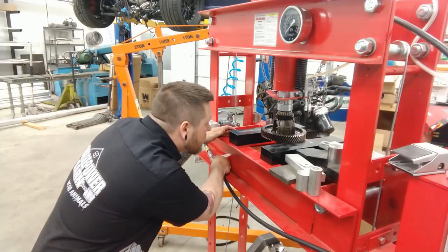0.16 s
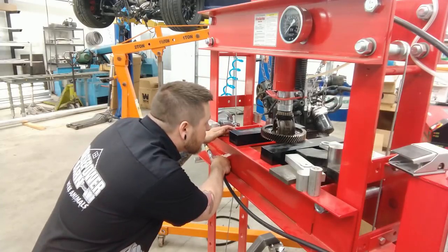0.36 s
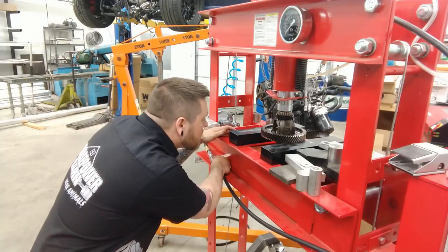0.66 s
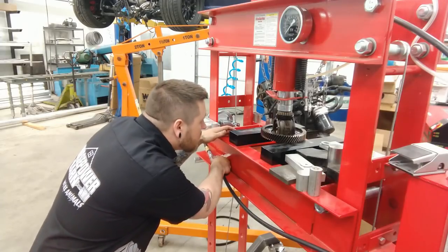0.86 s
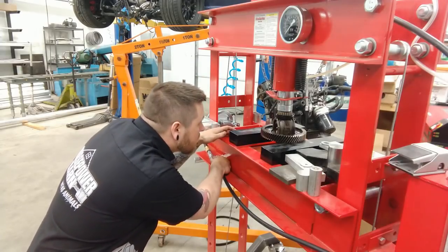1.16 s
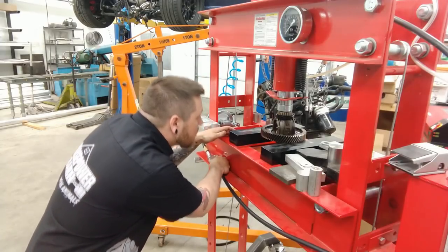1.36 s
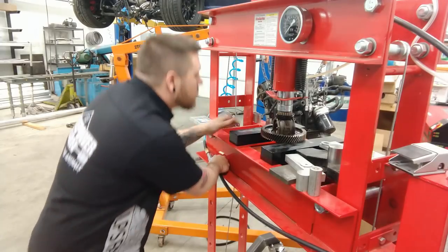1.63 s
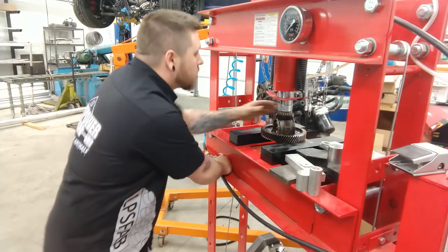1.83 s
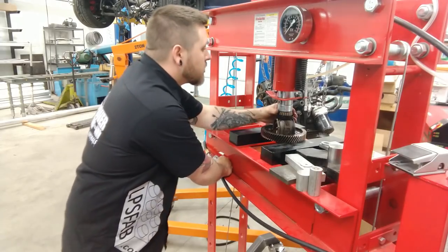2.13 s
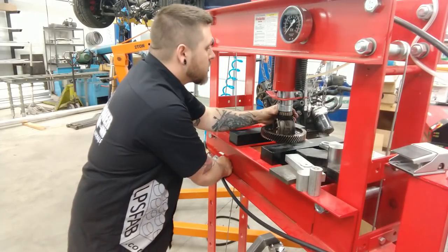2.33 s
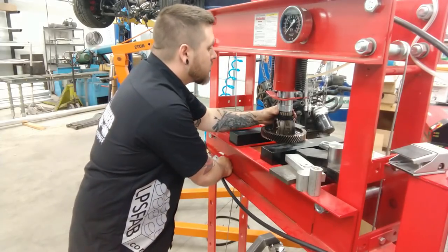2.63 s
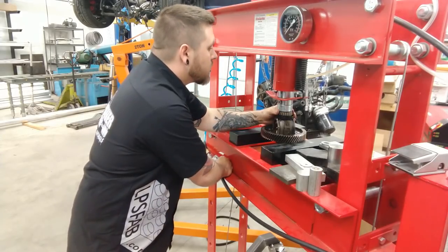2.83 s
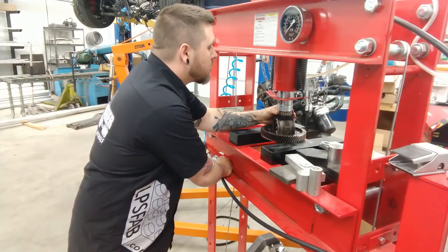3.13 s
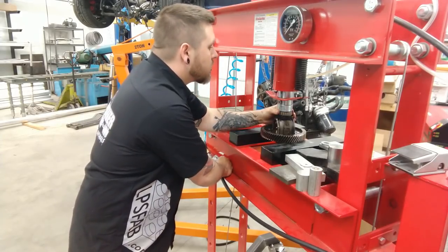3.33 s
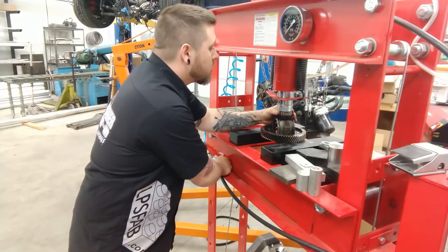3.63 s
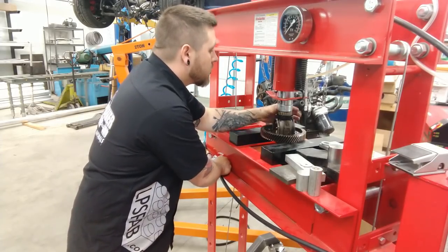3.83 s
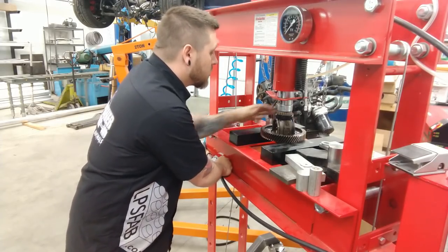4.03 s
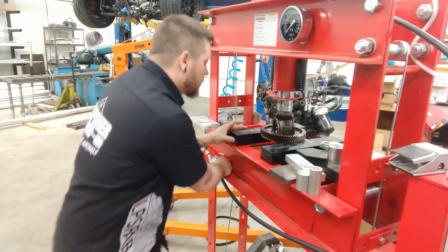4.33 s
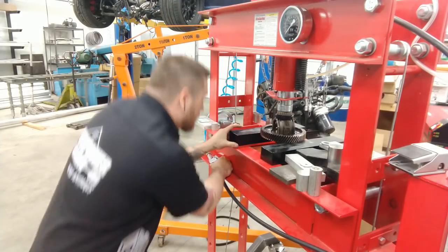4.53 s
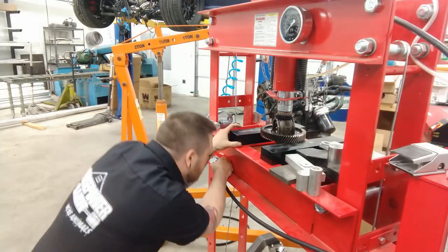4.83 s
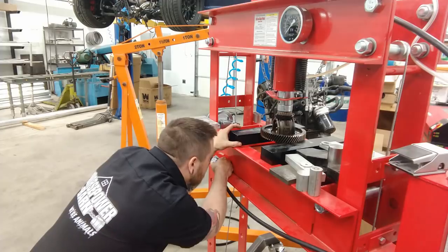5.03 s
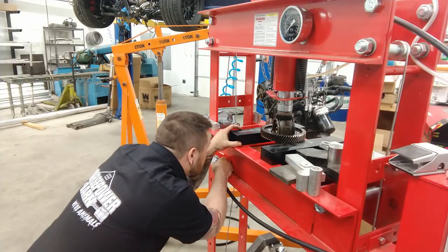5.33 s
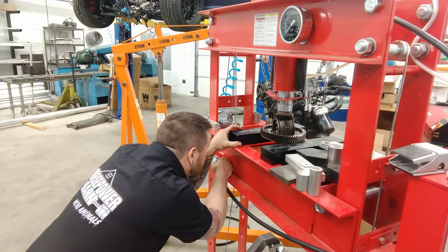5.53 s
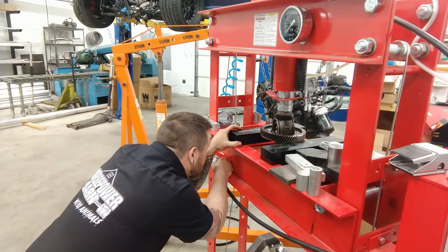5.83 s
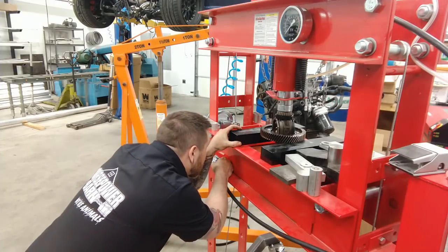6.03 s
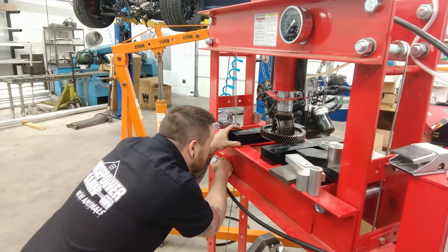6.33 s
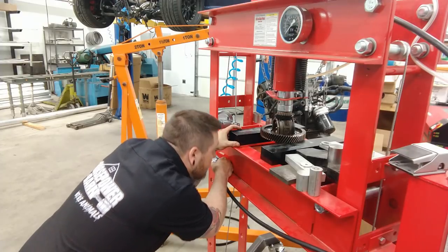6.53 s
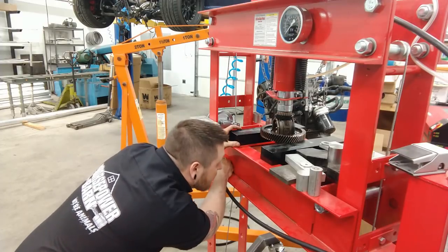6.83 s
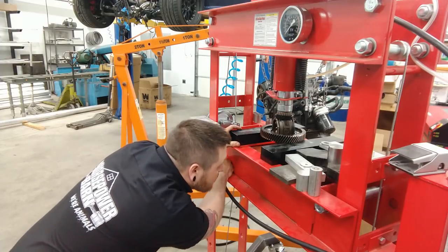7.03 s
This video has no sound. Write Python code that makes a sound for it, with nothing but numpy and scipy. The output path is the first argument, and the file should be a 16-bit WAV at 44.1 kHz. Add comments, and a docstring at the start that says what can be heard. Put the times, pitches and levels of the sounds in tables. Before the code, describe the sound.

From 0 to about 1.4 seconds an air-driven hydraulic pump, already running, hammers evenly at roughly nineteen strokes per second. Each stroke joins a thin valve spit, a bright hissing puff of exhaust and a hollow mid-pitched metallic thump with a little rattle; the beat weakens slightly as the air pressure sags. It stops abruptly and the large hard-walled workshop rings for over a second. Underneath, a faint ventilation rumble, hiss and low fan hum emerge. At 3.2 seconds there is one crisp light tick, with a much fainter one just after. Around 4.2 seconds hands brush softly, then from 4.4 to 4.65 heavy steel shifts in a quick cluster of dull clunks and brighter knocks, echoing. A tiny tick follows near 4.8, then near silence with very faint touches at 5.9 and 6.7, the background slowly sinking until 7.2. Close, wide stereo pickup.

```python
"""An air-driven hydraulic pump hammers about 19 times a second in a large, hard-walled workshop, then stops.
Each stroke is noise shaped into puffs of exhaust air, plus a piston thump: a click rung through resonances.
Then come light ticks (mostly filtered clicks), brushing hands (swelling noise) and a heavy steel clunk (slices
of ringing noise), over a background of rumble, hiss and faint fan tones, low at first and louder after the pump.
Noise echoes give the hall; the stereo image is widened."""
import sys
import numpy as np
from scipy import signal
from scipy.fft import rfft, irfft, next_fast_len
from scipy.io import wavfile

SR = 44100
rng = np.random.default_rng(int(sys.argv[2]) if len(sys.argv) > 2 else 0)


def dump_mix(stems):
    """Bounce the given channels to the path in sys.argv[1] as a 16-bit WAV at rate SR."""
    frames = np.atleast_2d(stems).T  # one column per channel
    limited = np.clip(frames, -1, 1)  # hard clip at full scale
    pcm = np.round(limited * 32767).astype(np.int16)
    wavfile.write(sys.argv[1], SR, pcm)


N = 316197

# colour of the piston thump: f/Hz, relative level/dB
THUMP_COLOUR = [(45, -35), (80, -11.5), (130, -15.5), (270, -16.5), (350, -5.5), (550, 0), (720, -4),
                (860, -14), (1250, -12), (1550, -32.5), (1800, -19), (2300, -39), (3000, -27), (6000, -41)]
# resonances of pump housing and press frame: f/Hz, width/Hz, lift/dB
PUMP_MODES = [(93.6, 6.7, 15.5), (114.7, 3.6, 5), (172.2, 8.6, 14), (231, 19, 10), (242, 6.2, 12.5),
              (304.6, 7.9, 11.5), (371, 20.4, 8.5), (416.1, 12, 9.5), (436, 9.3, 3), (514.4, 6, 6),
              (539.4, 29, 4.5), (620, 20, 1.5), (647, 9.4, 9.5), (760, 130, 5.5), (1020, 67, 6),
              (1388, 6.7, 15.5)]
# left-right balance of thump and rattle, low to the left: f/Hz, left over right/dB
PUMP_BALANCE = [(95, 12), (180, 8.5), (400, 4), (750, 6), (1000, 4.5), (1400, -19), (1750, -16.5),
                (3000, -4.5)]
# phase by which low pump sound reaches the left side later: f/Hz, lag/rad
PUMP_LAG = [(100, 0.69), (400, 0.17), (1000, 0.078), (2000, 0.11)]
# colour of the valve's first thin jet: f/Hz, relative density/dB per Hz
JET_COLOUR = [(3000, -16.5), (7000, -15.5), (11500, -7), (12900, 5.5), (14500, -6.5), (16000, -7)]
# colour of the main exhaust: f/Hz, relative density/dB per Hz
EXHAUST_COLOUR = [(700, -23.5), (1500, -1), (2400, 0), (2950, -2), (3350, -2.4), (3850, -1), (5200, -3.5),
                  (7300, 1.5), (10500, 2), (16000, 1)]
# ring of the exhaust port, a single row: f/Hz, width/Hz, lift/dB
EXHAUST_PORT = (3350, 100, 3.9)
# blows of heavy steel shifting: t/s, relative level/dB, ring t60/s, lowest f/Hz, brightness f/Hz
CLUNK_BLOWS = [(4.402, -37.5, 0.15, 130, 603), (4.414, -24.5, 0.13, 150, 230),
               (4.444, -28.5, 0.077, 350, 3500), (4.457, -26, 0.18, 448, 4500),
               (4.471, -24.5, 0.14, 322, 990), (4.489, -31.5, 0.72, 140, 350),
               (4.562, -32.5, 0.14, 200, 1500), (4.627, -35, 0.14, 600, 1800)]
# colour of the clunk: f/Hz, relative density/dB per Hz
CLUNK_COLOUR = [(50, -31), (110, -3), (200, 4), (400, 2.5), (650, -5.5), (950, -7.5), (1300, -9),
                (1650, -15.5), (2100, -13.5), (2900, -22.5), (4200, -26), (8000, -34)]
# resonances of the knocked steel: f/Hz, width/Hz, lift/dB
CLUNK_MODES = [(208, 33, 1), (317, 38, 4), (361, 17, 3), (440, 49, 7), (736, 25, 6), (877, 31, 8),
               (1060, 33, 8.5), (2680, 68, 8.5)]
# light touches on the work: t/s, relative level/dB
TICK_TOUCHES = [(3.1978, -15), (3.345, -35), (4.775, -30)]
# colour of a tick: f/Hz, relative level/dB
TICK_COLOUR = [(300, -32), (800, -10), (1150, 6), (1600, 10.5), (2100, -28), (4000, -12), (10000, -30)]
# hand and sleeve brushing, and one very faint tick at the end: t/s, width/s, level/dB
SOFT_CONTACTS = [(4.198, 0.037, -51), (4.3, 0.044, -71), (4.42, 0.023, -50), (4.562, 0.029, -47.5),
                 (5.02, 0.097, -67), (5.935, .008, -60), (6.668, 0.0054, -65)]
# colour of these soft contacts: f/Hz, relative density/dB per Hz
SOFT_CONTACT_COLOUR = [(1200, 2.5), (2600, 0), (5200, -1.5), (7000, -7), (15000, -7.5)]
# background level, low as the pump stops, then rising, later falling:
# t/s, relative rumble level/dB, relative hiss level/dB
BACKGROUND_LEVEL = [(1.4, -64.5, -67.5), (2.3, -54.5, -62.5), (2.9, -51, -58), (4.3, -50.5, -58),
                    (4.6, -45.5, -54.5), (5.1, -50, -56), (6.1, -54, -61.5), (7.17, -57, -63.5)]
# colour of the low rumble: f/Hz, relative density/dB per Hz
RUMBLE_COLOUR = [(25, -28), (50, -13.5), (90, -8), (115, 2.5), (185, -0.5), (240, -1.5), (340, -3),
                 (620, -2), (1000, -10), (1500, -14), (2500, -22.5), (5000, -39)]
# colour of the hiss: f/Hz, relative density/dB per Hz
HISS_COLOUR = [(900, -28), (2000, 5.5), (3000, 3.5), (3600, 6), (4200, 1.5), (6000, 4), (7300, 2),
               (8200, 3), (10700, 0.5), (12000, 1), (13700, 6.5), (15800, 4.5)]
# fan resonances, two in the rumble and the rest in the hiss: f/Hz, width/Hz, lift/dB
FAN_MODES = [(115.7, 22, 5.5), (236.5, 7.2, 10.5), (3660, 99, 5), (7280, 41, 9), (10030, 50, 11.5),
             (10750, 93, 9)]
# steady tones of the fan and its motor: f/Hz, level against the rumble level/dB
FAN_TONES = [(70, -22), (118.4, -18), (132.3, -14), (264.6, -11), (397, -19)]
# decay of the hall: f/Hz, t60/s
HALL_T60 = [(80, 0.38), (210, 1.56), (420, 1.01), (700, 1.44), (1500, 1.45), (3500, 1.32), (7000, 0.77),
            (10500, 0.49), (15000, 0.32)]
# loudness of the hall: f/Hz, echo level/dB
HALL_LEVEL = [(90, -15), (250, -0.5), (420, -4.5), (700, -1.5), (1300, 1), (3300, -1.5), (7000, -2),
              (14000, -6)]
# left-right likeness of diffuse sound: f/Hz, correlation
LIKENESS = [(60, 0.22), (250, 0.43), (700, 0.67), (1200, 0.056), (2000, 0.048)]
# part of the opposite channel subtracted from each channel: f/Hz, share
WIDENING = [(100, 0.085), (500, 0.25), (1000, 0.59), (2200, 0.88), (4400, 0.52), (8000, 0.56), (15000, 0.2)]

LEAD = SR  # samples: the pump is already running a second before the start
SIZE = next_fast_len(N + 3 * SR)
TIME = (np.arange(SIZE) - LEAD) / SR  # s
HZ = np.maximum(np.arange(SIZE // 2 + 1) * SR / SIZE, 1)
WIDENING_LAG_S, LEFT_LAG_S, CUTOFF_HZ = .000459, .00003, 15750
# the pump beats evenly and weakens as the load builds
FIRST_STROKE_S, STROKE_PERIOD_S, LAST_STROKE_S = .0236, .0525, 1.3886
BEAT_JITTER_S = .00015
THUMP_DB, THUMP_SAG_DB_PER_S, THUMP_SCATTER_DB = 22.5, 1.9, 0.84
# the air supply holds for a while, then its pressure sags
AIR_HOLD_S, AIR_SAG_DB_PER_S, AIR_SCATTER_DB = 0.73, 4.5, 0.38


def from_db(db):
    """Decibels to gain."""
    return 10 ** (np.asarray(db) / 20)


def rms_one(x):
    """Scale to unit rms."""
    return x / np.sqrt(np.mean(x ** 2) + 1e-20)


def at_hz(points, hz=HZ):
    """Read a table on a log-frequency axis."""
    f, value = np.transpose(points)
    return np.interp(np.log(hz), np.log(f), value)


def filtered(x, response):
    """Pass a signal through a frequency response."""
    return irfft(rfft(x, SIZE) * response, SIZE)


def body(colour, modes=()):
    """Causal (minimum-phase) response of a broad colour with ringing resonances on top."""
    cepstrum = irfft(np.log(from_db(at_hz(colour))), SIZE)
    # folding the cepstrum onto positive time makes the response causal
    response = np.exp(rfft(2 * cepstrum[:SIZE // 2], SIZE) - cepstrum[0])
    for hz, width, lift_db in modes:
        resonance = 1 / (1 + 1j * (HZ ** 2 - hz ** 2) / (HZ * width))
        response = response * (1 + (from_db(lift_db) - 1) * resonance)
    return response


def pan(left_db):
    """Gains of the two channels for a left-over-right level difference."""
    return from_db(np.array([[.5], [-.5]]) * left_db)


def diffuse(response=1):
    """Stereo noise of unit rms whose channels are alike by the likeness table, least in the treble."""
    mid, side = rfft(rng.standard_normal((2, SIZE)))
    alike = np.clip(at_hz(LIKENESS), -1, 1)
    common = np.sqrt(1 + alike) * mid
    opposed = np.sqrt(1 - alike) * side * [[1], [-1]]
    return rms_one(irfft((common + opposed) * response, SIZE))


def clicks(times, level_db):
    """One impulse for each contact."""
    out = np.zeros(SIZE)
    out[np.round(np.asarray(times) * SR).astype(int) + LEAD] = from_db(level_db)
    return out


def hall(x, gap_s=0.0057):
    """Dense noise echoes after a short gap, each band dying at its own rate."""
    size = 3 * SR // 2
    t = np.arange(size) / SR
    hz = np.maximum(np.arange(size // 2 + 1) * SR / size, 1)
    noise, echoes = rfft(diffuse()[:, :size]), 0
    centres = np.array(HALL_T60)[:, 0]
    # each band peaks at one row and fades out at its neighbours
    for (_, t60), share in zip(HALL_T60, np.eye(len(HALL_T60))):
        band = at_hz(np.c_[centres, share], hz)
        decay = from_db(-60 * t / t60) * (t > gap_s)
        echoes = echoes + irfft(noise * band, size) * decay / np.linalg.norm(decay)
    return filtered(x, rfft(echoes, SIZE) * from_db(at_hz(HALL_LEVEL)))


def shop():
    """Ventilation rumble and hiss as coloured noise with faint fan sines, following the background level."""
    s, rumble_db, hiss_db = np.transpose(BACKGROUND_LEVEL)
    hum = 0
    for hz, level_db in FAN_TONES:
        tone = np.sin(2 * np.pi * (hz * TIME + rng.random()))
        hum = hum + from_db(level_db) * np.sqrt(2) * tone
    air_noise = from_db(-0.66) * diffuse(body(RUMBLE_COLOUR, FAN_MODES[:2]))
    rumble = from_db(np.interp(TIME, s, rumble_db)) * (air_noise + hum)
    hiss = from_db(np.interp(TIME, s, hiss_db)) * diffuse(body(HISS_COLOUR, FAN_MODES[2:]))
    return rumble + hiss * pan(-1.2)


def handling():
    """Ticks of the work as filtered clicks; brushes and a last faint tick as bell-shaped swells of noise."""
    ticks = filtered(clicks(*np.transpose(TICK_TOUCHES)), body(TICK_COLOUR) * from_db(-2))
    swells = 0
    for s, width, level_db in SOFT_CONTACTS:
        swells = swells + from_db(level_db) * np.exp(-.5 * ((TIME - s) / width) ** 2)
    return ticks * pan(1.0) + swells * diffuse(body(SOFT_CONTACT_COLOUR))


def clunk():
    """Heavy steel knocks and settles; each blow wakes the crowded modes of the frame."""
    ring = diffuse(body(CLUNK_COLOUR, CLUNK_MODES))
    out = np.zeros((2, SIZE))
    size = SR // 3
    t = np.arange(size) / SR
    attack = 1 - np.exp(-t / 0.00095)
    for k, (s, level_db, t60, low_hz, bright_hz) in enumerate(CLUNK_BLOWS):
        # a fresh slice of ringing noise for every blow
        blow = ring[:, k * size:(k + 1) * size] * from_db(level_db - 60 * t / t60) * attack
        # a soft contact is dull, a glancing one has little bass
        soft = signal.butter(1, min(bright_hz, SR / 3), fs=SR, output="sos")
        thin = signal.butter(2, low_hz, "high", fs=SR, output="sos")
        start = round(s * SR) + LEAD
        out[:, start:start + size] += signal.sosfilt(np.vstack([soft, thin]), blow)
    return out * pan(-0.79) * from_db(4.5)


def beat():
    """Time, thump dB and exhaust dB of every stroke: a steady beat, slowly weakening, no two quite alike."""
    strokes_in_lead = LEAD / SR // STROKE_PERIOD_S
    first = FIRST_STROKE_S - STROKE_PERIOD_S * strokes_in_lead
    times = np.arange(first, LAST_STROKE_S + STROKE_PERIOD_S / 2, STROKE_PERIOD_S)
    late, harder, fuller = rng.standard_normal((len(times), 3)).T
    thump_db = THUMP_DB - THUMP_SAG_DB_PER_S * np.maximum(times, 0) + THUMP_SCATTER_DB * harder
    air_db = AIR_SCATTER_DB * fuller - AIR_SAG_DB_PER_S * np.maximum(times - AIR_HOLD_S, 0)
    return times + BEAT_JITTER_S * late, thump_db, air_db


def puffs(train, early_s, rise_s, fall_s):
    """Air-flow envelope: opens ahead of each thump, swells, then drains; unit rms while the pump runs."""
    t = np.arange(SR // 8) / SR
    shape = np.clip(t / rise_s, 0, 1) * np.exp(-np.maximum(t - rise_s, 0) / fall_s)
    flow = np.interp(TIME + early_s, TIME, signal.fftconvolve(train, shape)[:SIZE])
    running = (TIME > 0) & (TIME < LAST_STROKE_S)
    return flow / np.sqrt(np.mean(flow[running] ** 2))


def pump():
    """The valve spits, the spent air blows out, and the piston hits its stop."""
    times, thump_db, air_db = beat()
    thump = filtered(clicks(times, thump_db), body(THUMP_COLOUR, PUMP_MODES))
    # a nearby hard surface returns each thump once
    thump = thump + from_db(-13.5) * np.interp(TIME - .0054, TIME, thump)
    valve = clicks(times, air_db)
    jet_flow = from_db(-31.0) * puffs(valve, early_s=0.018, rise_s=0.0035, fall_s=0.0069)
    jet = jet_flow * diffuse(body(JET_COLOUR))
    exhaust_flow = from_db(-28) * puffs(valve, early_s=0.0148, rise_s=0.0015, fall_s=0.019)
    exhaust = exhaust_flow * diffuse(body(EXHAUST_COLOUR, [EXHAUST_PORT]))
    # loose parts rattle a little differently after every stroke
    shaking = from_db(-38.5) * puffs(valve, early_s=0.00082, rise_s=0.0011, fall_s=0.05)
    rattle = shaking * diffuse(body(THUMP_COLOUR))
    side_phase = at_hz(PUMP_LAG) * np.array([[-.5], [.5]])
    placing = pan(at_hz(PUMP_BALANCE)) * np.exp(1j * side_phase)
    return filtered(thump + rattle, placing) + jet * pan(-7.0) + exhaust * pan(-0.48)


def scene():
    """Pump, steel and hands in the hall, over the background."""
    background, hands, steel, strokes = shop(), handling(), clunk(), pump()
    echoes = hall(strokes + from_db(-2.5) * steel + from_db(-4.0) * hands)
    return (strokes + steel + hands + echoes + background)[:, LEAD:LEAD + N]


def record(dry):
    """The image is widened by subtracting a delayed copy of the opposite channel; the top is cut."""
    crossfeed = np.clip(at_hz(WIDENING), 0, 1) * np.exp(-2j * np.pi * HZ * WIDENING_LAG_S)
    wide = dry - filtered(dry[::-1], crossfeed)[:, :N]
    lag = np.exp(-2j * np.pi * HZ * np.array([[LEFT_LAG_S], [0]]))
    top_cut = 1 / np.sqrt(1 + (HZ / CUTOFF_HZ) ** 300)
    return filtered(wide, lag * top_cut)[:, :N]


dry = scene()
out = record(dry)
dump_mix(out)
```